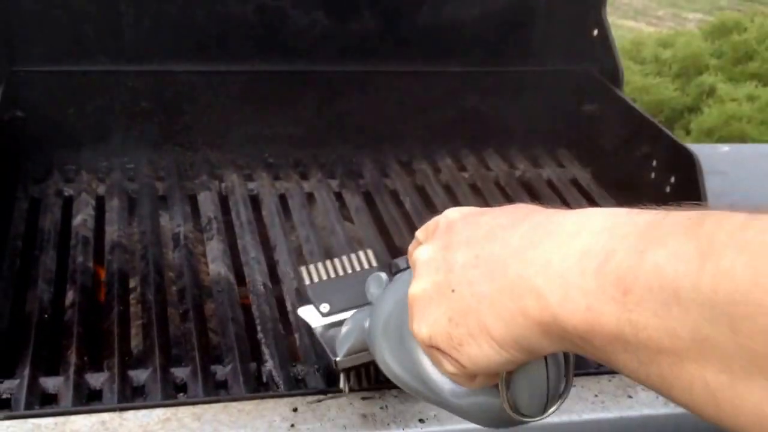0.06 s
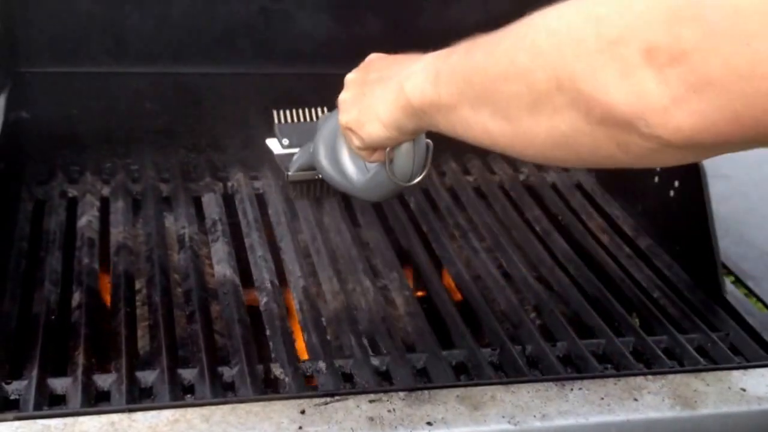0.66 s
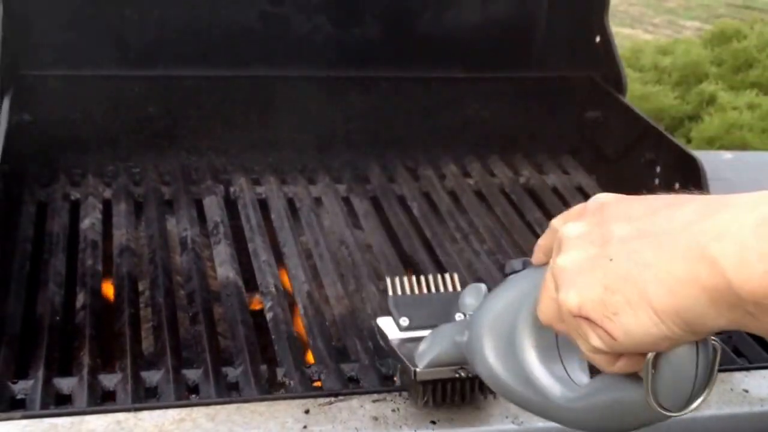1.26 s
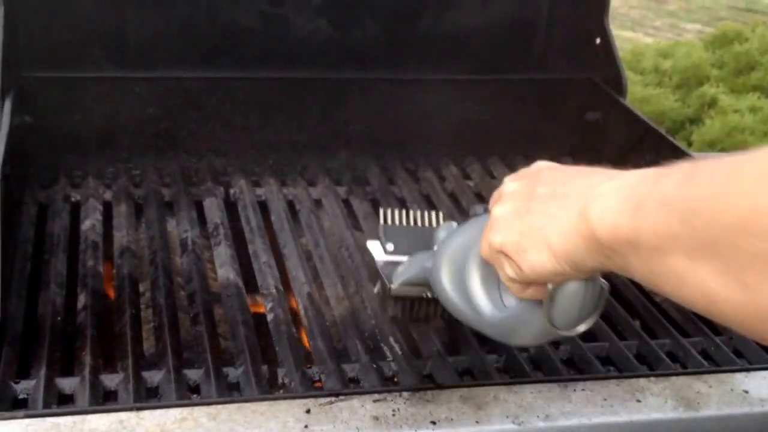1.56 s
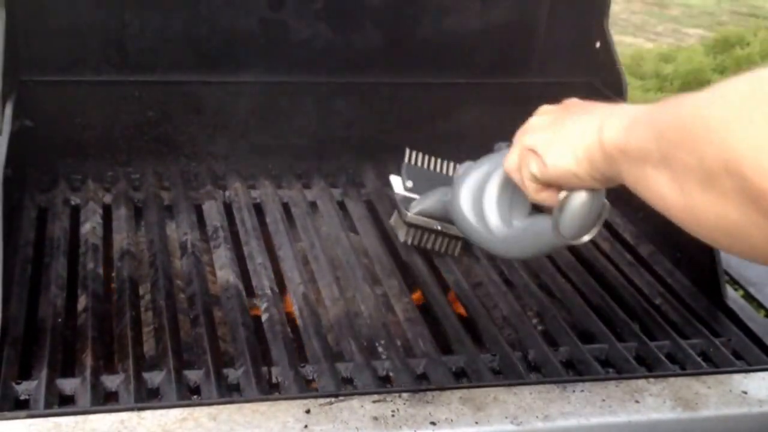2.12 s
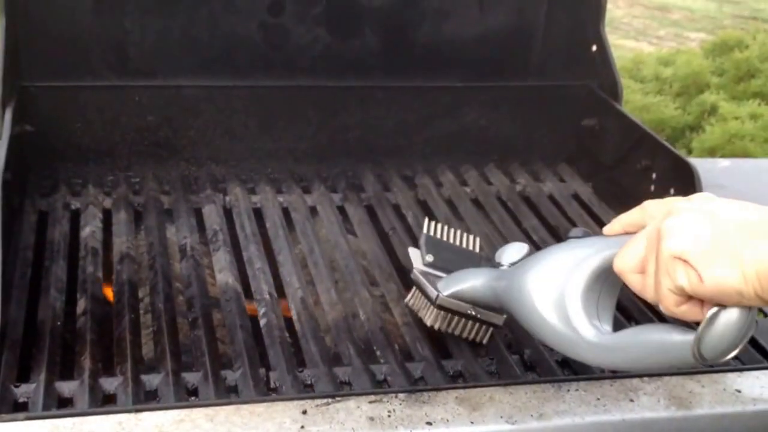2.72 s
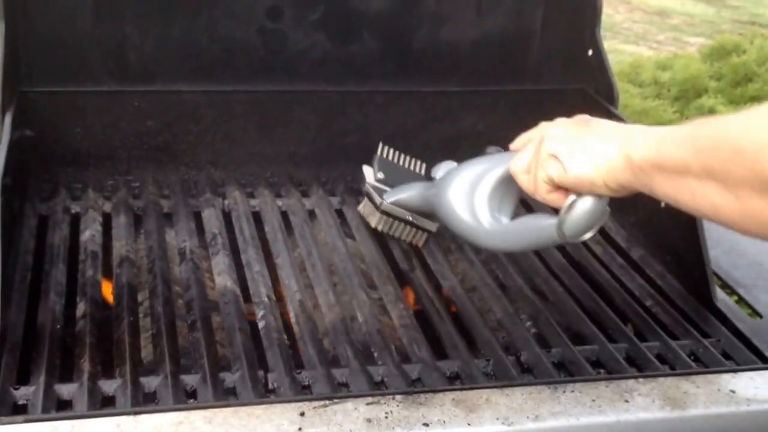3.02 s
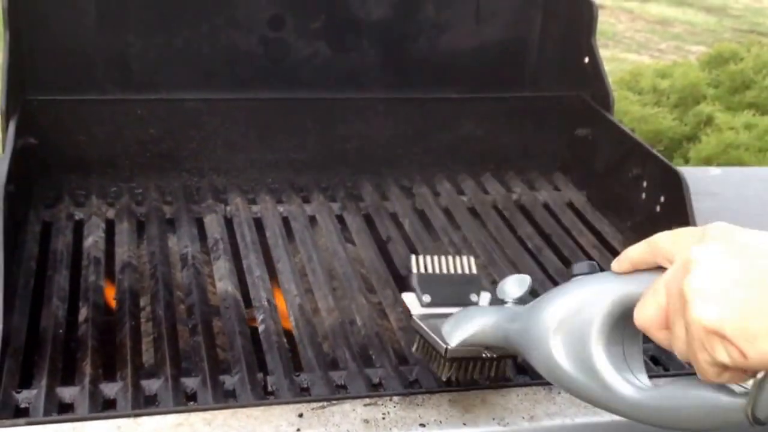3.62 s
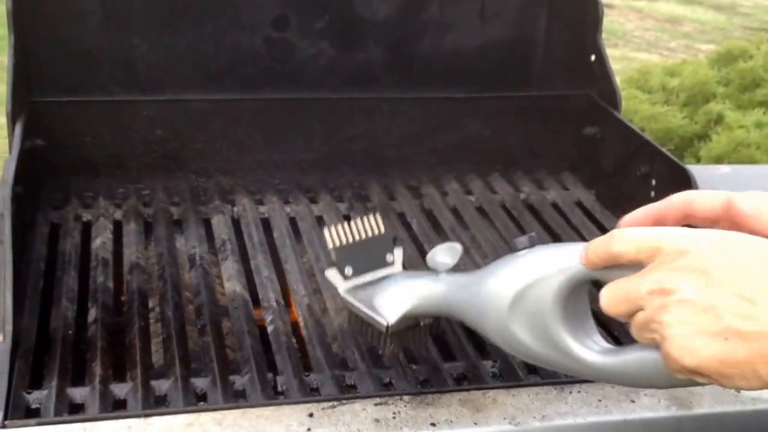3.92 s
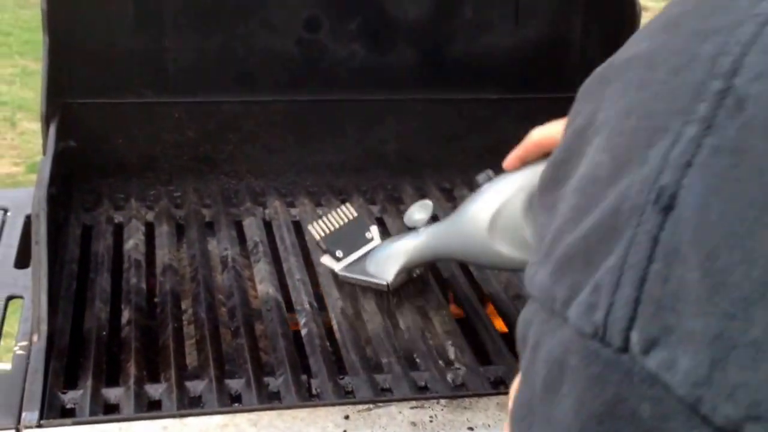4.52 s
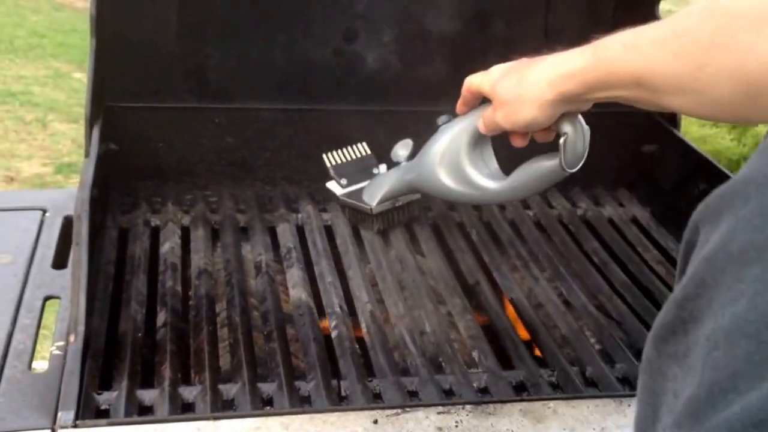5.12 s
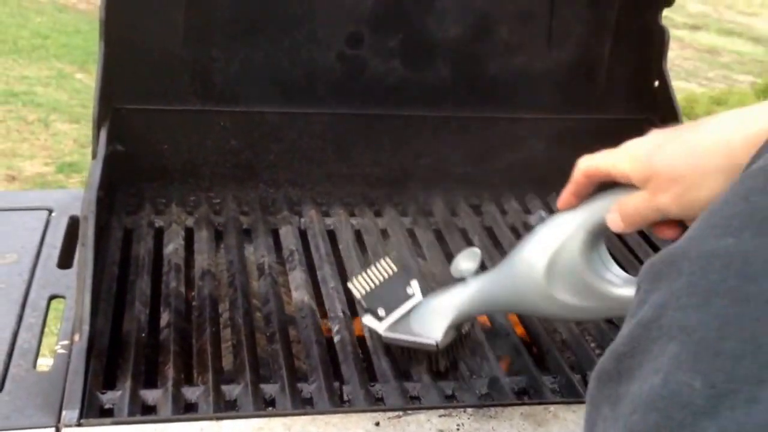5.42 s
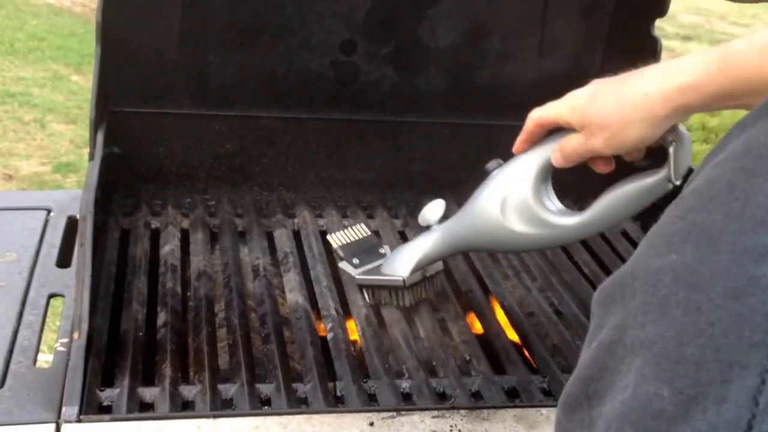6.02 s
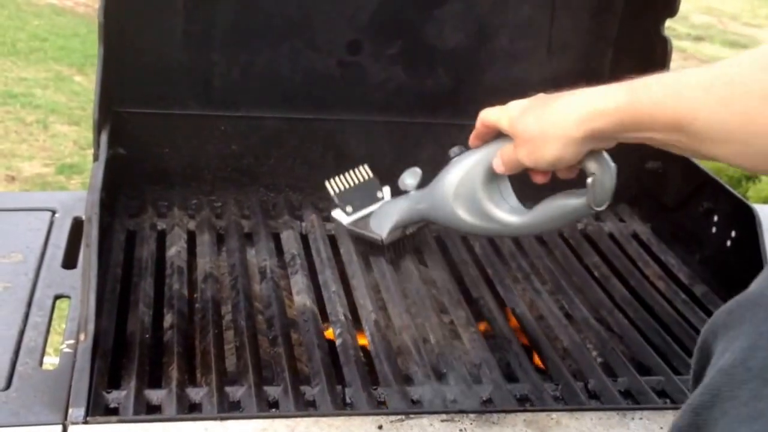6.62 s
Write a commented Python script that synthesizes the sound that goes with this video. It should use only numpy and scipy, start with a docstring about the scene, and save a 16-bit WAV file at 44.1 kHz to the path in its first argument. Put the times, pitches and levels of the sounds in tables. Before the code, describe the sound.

Wire bristles scrape along hot grill bars in repeated strokes while water hisses into steam, rising and falling with the brush. Four loud, ringing metal bangs, two early and two later, stand out from small knocks. Between the pairs come one dry tick of spitting grease and some thin wire squeaks. It is all heard close up, outdoors, over a low murmur of gas flames.

```python
"""A wire steam brush scrubs the hot grate of a gas grill, outdoors and close by. From the first stroke the
bristles scrape the bars with a high swish and water hisses into steam, all rising with the brush's speed.
At 0.6 and 1.7 s, among lighter knocks, its head bangs the far end of the grate and the steel firebox and
hood ring in their natural modes. At 2 s grease spits once; from then to 3.6 s single wires squeak by
stick-slip friction. Two more bangs come at 4.6 and 5.9 s. The burners murmur below throughout."""
import sys
import numpy as np
from scipy import signal
from scipy.fft import rfft, irfft, next_fast_len
from scipy.io import wavfile

SR = 44100
rng = np.random.default_rng(int(sys.argv[2]) if len(sys.argv) > 2 else 0)


def unload_audio(sound):
    """Save the sound as a 16-bit wav file, at the path given as the first command line argument."""
    columns = np.transpose(np.atleast_2d(sound))
    # keep every value between -1 and 1, then stretch to whole-number steps
    steps = np.round(np.clip(columns, -1, 1) * 32767)
    wavfile.write(sys.argv[1], SR, steps.astype(np.int16))


N = 298116
TIME = np.arange(N) / SR


# Blows of the brush head. Each row: start in seconds, relative level in dB, treble gain in dB,
# rise time in seconds, frequency the struck spot favours in Hz, its boost in dB.
BLOWS = [(.057, -28.5, 5.5, 0.0025, 263, 11), (.082, -37, -16, 0.007, 525, 27),
         (.240, -18.5, -3.5, 0.017, 432, 13), (.263, -22, -8, 0.0025, 1010, 3),
         (.617, -3, -2, 0.0032, 416, 3), (.654, -23, 5.5, 0.0022, 219, 10),
         (.944, -20.5, -1, 0.017, 950, -6), (1.176, -24, -3, 0.02, 1060, 10.5),
         (1.429, -34.5, 11.5, 0.012, 457, 6.5), (1.612, -30, -13, .003, 1100, -6),
         (1.707, -2, -3, 0.0011, 1000, 2), (2.144, -16, -5, 0.017, 234, 13),
         (2.741, -37, -12, 0.0041, 550, 13), (2.808, -26, -2.5, 0.0011, 1680, 5.5),
         (3.250, -23, -9, 0.0084, 437, 4), (3.988, -32.5, 14.5, 0.0033, 600, -12),
         (3.999, -18, -6, .0025, 510, 11.5), (4.595, -2.5, -.5, 0.0012, 1990, 4.5),
         (5.158, -24, 3.5, 0.003, 605, 9), (5.519, -29.5, 10.5, 0.012, 527, 14),
         (5.9, -2.5, 0.5, 0.0013, 1840, 4), (6.613, -26, -4, 0.0021, 550, 10.5)]
# Short, strong modes of grate and firebox. Each row: frequency in Hz, relative level in dB, T60 in seconds.
GRATE_RESONANCES = [(168, -24, .12), (190, -13, .13), (238, -18, .16), (320, -16, .17), (350, -15, .15),
                    (379, -13, .16), (408, -11, .17), (522, -21, .15), (551, -20, .17), (590, -23, .18),
                    (780, -24, .2), (830, -26, .2), (938, -20, .17), (965, -22, .17), (1003, -21, .18),
                    (1069, -25, .2), (1148, -26, .2), (1182, -29, .2), (1355, -29, .2), (1591, -25, .3),
                    (1759, -26, .22), (1820, -25, .2), (1858, -24, .2), (2010, -28, .2), (2055, -28, .2),
                    (2191, -31, .2), (2320, -32, .2), (2486, -31, .2), (2885, -33, .15), (2950, -33, .15)]
# Long, faint modes of the open hood. Each row: frequency in Hz, relative level in dB, T60 in seconds.
HOOD_RESONANCES = [(135, -41, 1.6), (195, -32, .9), (211, -31, .8), (250, -32, .5), (330, -35, .5),
                   (388, -31, 1.1), (434, -34, .7), (527, -35, 1.0), (640, -38, .6), (870, -39, .6),
                   (1010, -38, .6), (1620, -37, .5)]
# Fast decay of the sheet steel. Each row: frequency in Hz, T60 in seconds.
SHEET_DECAY = [(40, .15), (150, 0.33), (400, 0.17), (1000, 0.31), (2000, 0.17), (4000, 0.27), (15000, 0.19)]
# Lingering ring of the sheet steel. Each row: frequency in Hz, level in dB relative to the fast decay.
SHEET_TAIL = [(60, -36), (130, -51), (250, -9.5), (500, -9), (1000, -11.5), (2000, -11), (4000, -25),
              (15000, -17)]

def knocks(crack_hz=1500, crack_db=7, crack_t60=0.016, tail_t60=0.77, travel_s=0.00187,
           modes_db=2, sheet_db=-11, uneven_db=3.0):
    """Modal superposition: each impact excites damped modes, the strong ones as tones, the rest as noise."""
    out, t = np.zeros(N), TIME[:SR]
    centres, bands = sheet_bands()
    hz, mode_db, t60 = np.transpose(GRATE_RESONANCES + HOOD_RESONANCES)[:, :, None]
    crack = from_db(crack_db) * fade(t, crack_t60) * centres / (centres + crack_hz)
    tail = from_db(at_hz(SHEET_TAIL, centres)) * fade(t, tail_t60)
    sheet_envelope = crack + fade(t, at_hz(SHEET_DECAY, centres)) + tail
    # a blow reaches each part of the box a moment later
    since = np.maximum(t - travel_s * rng.random(hz.shape), 0)
    rings = np.sin(2 * np.pi * hz * since) * fade(since, t60)
    for start_s, level_db, treble_db, rise_s, favoured_hz, boost_db in BLOWS:
        start = int(start_s * SR)
        size = min(SR, N - start)
        mode_gains = from_db(modes_db + mode_db + uneven_db * rng.standard_normal(hz.shape))
        mode_gains *= contact(hz, treble_db, favoured_hz, boost_db)
        body = mode_gains[:, 0] @ rings[:, :size]
        band_gains = from_db(sheet_db) * contact(centres[:, 0], treble_db, favoured_hz, boost_db)
        clash = band_gains @ (sheet_envelope[:, :size] * bands[:, start:start + size])
        attack = 1 - np.exp(-t[:size] / rise_s)
        out[start:start + size] += from_db(level_db) * attack * (body + clash)
    return out


def contact(hz, treble_db, favoured_hz, boost_db, corner_hz=1400, spread_octaves=0.18):
    """Impact excitation: a harder contact adds treble, and each spot on the grate favours its own modes."""
    treble = hz ** 4 / (hz ** 4 + corner_hz ** 4)
    favoured = np.exp(-(np.log2(hz / favoured_hz) / spread_octaves) ** 2)
    return from_db(treble_db * treble + boost_db * favoured)


# The crowd of weak sheet-steel modes. Each row: frequency in Hz, relative spectral density in dB.
SHEET_SPECTRUM = [(40, -34), (90, -44), (150, -6), (250, 3.5), (420, 2.5), (680, -8.5), (950, -1.5),
                  (1300, -8), (1900, -8), (2600, -11), (3400, -16), (4800, -24.5), (6200, -14.5),
                  (9000, -30), (15000, -28)]

def sheet_bands():
    """Modal overlap: dense modes act as noise. Gives centres and third-octave bands that sum to rms 1."""
    edges = 30 * 2 ** (np.arange(28) / 3 + 1 / 10)
    centres = np.sqrt(edges[1:] * edges[:-1])
    white = rng.standard_normal((2, N))
    bands = []
    for k, hz in enumerate(centres):
        bandpass = signal.butter(2, edges[k:k + 2], "band", fs=SR, output="sos")
        bands.append(from_db(at_hz(SHEET_SPECTRUM, hz)) * signal.sosfilt(bandpass, white[k % 2]))
    return centres[:, None], np.array(bands) / np.std(np.sum(bands, axis=0))


# Sweeps of the brush along the bars. Each row: start, fastest moment and stop in seconds,
# then relative levels of scrape, swish and steam at full speed in dB.
SWEEPS = [(-.18, 0.107, 0.32, -46, -44.5, -44), (.15, 0.408, 0.79, -44.5, -38, -38),
          (0.638, 0.963, 1.54, -36.5, -41.5, -41.5), (1.304, 1.638, 1.97, -47, -43.5, -44.5),
          (1.992, 2.014, 2.46, -39, -45, -49.5), (2.24, 2.57, 2.87, -44, -51.5, -55),
          (2.702, 2.89, 3.195, -45.5, -44, -47.5), (3.144, 3.313, 3.58, -36.5, -38, -47),
          (3.45, 3.552, 3.67, -45.5, -66, -71), (3.776, 4.287, 4.32, -51.5, -48, -51),
          (4.215, 4.544, 4.62, -48.5, -41, -42), (4.586, 4.834, 5.146, -45, -45, -49.5),
          (5.078, 5.266, 5.69, -39.5, -42.5, -45), (5.64, 5.925, 6.1, -64, -45.5, -46),
          (5.936, 6.246, 6.6, -44, -45, -46), (6.473, 6.751, 7.2, -37.5, -40.5, -42)]

def brushing():
    """Common excitation: one motion, the speed of the brush, drives scrape, swish and steam together."""
    *_, scrape_db, swish_db, steam_db = np.transpose(SWEEPS)
    return (scrape(stroke_level(scrape_db, exponent=1.17, rest_db=-62.5))
            + swish(stroke_level(swish_db, exponent=1.07, rest_db=-55))
            + steam(stroke_level(steam_db, exponent=0.94, rest_db=-54)))


def stroke_level(peaks_db, exponent, rest_db):
    """Power law: amplitude grows as a power of speed, a sine arch in each stroke. Gives dB over time."""
    power = from_db(rest_db) ** 2
    for (start_s, fastest_s, stop_s, *_), peak_db in zip(SWEEPS, peaks_db):
        speed = np.sin(np.pi / 2 * np.interp(TIME, [start_s, fastest_s, stop_s], [0, 1, 0]))
        power = power + (from_db(peak_db) * speed ** exponent) ** 2
    return 10 * np.log10(power)


# The scrape as the grate radiates it. Each row: frequency in Hz, relative spectral density in dB.
SCRAPE_SPECTRUM = [(80, 16.5), (150, -9), (220, 10.5), (310, -4), (500, 8.5), (690, -0.5), (780, 1),
                   (1400, -7), (1700, -6), (2700, -3.5), (3300, -16), (4400, -21), (6000, -37),
                   (15000, -41)]

def scrape(level_db, gain_db=1.5, slips_per_s=3000, ring_db=6, ring_width_hz=16):
    """Friction noise: wire tips catch and slip on crusted bars, driving grate modes of varying strength."""
    clicks = grains(slips_per_s, spread_db=2.5)
    judder = from_db(0.8 * drift(45))
    slips = colour(clicks * judder, SCRAPE_SPECTRUM)
    ringing = sum(resonate(slips, hz, ring_width_hz) * (-1) ** k * from_db(2.2 * drift(9))
                  for k, (hz, _, _) in enumerate(GRATE_RESONANCES))
    return (from_db(gain_db + level_db) + crush()) * rms_one(slips + from_db(ring_db) * ringing)


def crush(lead_db=-27, build_s=0.018):
    """Friction grows with load: bristles crushed on the rail swell the scrape just before each knock."""
    hits = np.zeros(N)
    for start_s, level_db, *_ in BLOWS:
        hits[int(start_s * SR)] = from_db(level_db + lead_db)
    # a decay run backwards in time builds up to each hit
    return signal.lfilter([1], [1, -np.exp(-1 / (build_s * SR))], hits[::-1] + 1e-18)[::-1]


# Spectral peaks of the swish. Each row: frequency in Hz, bandwidth in Hz, relative level in dB.
SWISH_RESONANCES = [(3970, 420, -5), (4420, 99, -6), (5340, 200, 2), (5850, 184, 4.5), (6290, 110, 3),
                    (6100, 3700, -3), (6440, 92, -22.5), (6830, 170, 0.5), (7370, 100, -2),
                    (8150, 350, -19)]

def swish(level_db, gain_db=-0.5, clicks_per_s=4000, spread_db=3.0, flutter_db=2.0):
    """Resonant filtering: a high, hissing swish with fixed narrow peaks, rising with each brush stroke."""
    hiss = sum(from_db(db + flutter_db * drift(30)) * resonate(grains(clicks_per_s, spread_db), hz, width)
               for hz, width, db in SWISH_RESONANCES)
    return from_db(gain_db + level_db) * rms_one(hiss)


# Water flashing to steam. Each row: frequency in Hz, relative spectral density in dB.
STEAM_SPECTRUM = [(500, -2), (2000, 2.5), (3300, -6), (4700, -16), (6500, 4), (9000, -3), (11000, -1.5),
                  (13500, 1.5), (15500, 0.5)]

def steam(level_db, gain_db=4, bursts_per_s=20000, spread_db=1.5, sputter_db=1.36):
    """Flash boiling: countless droplets burst on the hot bars and merge into a bright hiss."""
    envelope = from_db(gain_db + level_db + sputter_db * drift(40))
    return envelope * colour(grains(bursts_per_s, spread_db), STEAM_SPECTRUM)


# Single wires squeaking on a bar. Each row: start and length in seconds, first and last pitch in Hz,
# nominal level in dB.
WIRE_SQUEAKS = [(2.008, .03, 6850, 6550, -42), (2.078, .045, 6450, 6400, -44),
                (2.402, .025, 3600, 4000, -52), (2.78, .07, 7000, 6600, -44), (3.145, .05, 3500, 3800, -53),
                (3.19, .05, 3200, 2550, -50), (3.52, .06, 2500, 2900, -56)]

def squeaks():
    """Stick-slip oscillation: a wire grips and slides unevenly at its own pitch, gliding as it bends."""
    out = np.zeros(N)
    pitch_jitter = 1 + 0.03 * drift(900)
    grip = from_db(3 * drift(300))
    for start_s, length_s, from_hz, to_hz, db in WIRE_SQUEAKS:
        start, size = int(start_s * SR), int(length_s * SR)
        span = slice(start, start + size)
        phase = 2 * np.pi * np.cumsum(np.linspace(from_hz, to_hz, size) * pitch_jitter[span]) / SR
        arch = np.sin(np.linspace(0, np.pi, size))
        out[span] += from_db(db) * grip[span] * arch * np.sin(phase)
    return out


# Spitting grease. Each row: start in seconds, peak level in dB.
GREASE_POPS = [(2.043, -21.5)]

def grease_pop(hz=3200, width_hz=2000):
    """Impulse response: a drop of grease spits with one dry, heavily damped tick."""
    clicks = np.zeros(N)
    for start_s, db in GREASE_POPS:
        clicks[int(start_s * SR)] = from_db(db)
    tick = resonate(resonate(clicks, hz, width_hz), hz, width_hz)
    return tick * clicks.max() / np.abs(tick).max()


# Gas flames. Each row: frequency in Hz, relative spectral density in dB.
FLAME_SPECTRUM = [(30, -36), (80, 23), (130, -1), (200, 9.5), (310, -2.5), (430, 2), (560, -4), (720, -39),
                  (1500, -18), (4000, -14), (12000, -59)]

def burner(level_db=-44, flicker_db=1.2):
    """Combustion noise: flickering gas flames murmur in the firebox."""
    return from_db(level_db + flicker_db * drift(12)) * colour(rng.standard_normal(N), FLAME_SPECTRUM)


def from_db(db):
    """Decibels to amplitude gain."""
    return 10 ** (np.asarray(db) / 20)


def rms_one(x):
    """Normalisation to rms 1."""
    return x / np.sqrt(np.mean(x ** 2) + 1e-20)


def at_hz(points, hz):
    """Interpolation of a (Hz, value) table on a log-frequency axis."""
    freqs, values = np.transpose(points)
    return np.interp(np.log(hz), np.log(freqs), values)


def drift(knots_per_s):
    """Random modulation: a wander of rms 1 through random knots."""
    knots = rng.standard_normal(4096)
    return rms_one(np.interp(TIME * knots_per_s, np.arange(len(knots)), knots))


def fade(t, t60):
    """Exponential decay, 60 dB down after t60."""
    return np.exp(-np.log(1000) * t / t60)


def colour(x, spectrum):
    """Spectral shaping of a steady sound, scaled to rms 1."""
    size = next_fast_len(N)
    hz = np.maximum(np.fft.rfftfreq(size, 1 / SR), 1)
    return rms_one(irfft(rfft(x, size) * from_db(at_hz(spectrum, hz)), size)[:N])


def resonate(x, hz, width_hz):
    """Two-pole resonance with gain 1 at its peak."""
    r = np.exp(-np.pi * width_hz / SR)
    feedback = [1, -2 * r * np.cos(2 * np.pi * hz / SR), r * r]
    return signal.lfilter(np.array([1, 0, -1]) * (1 - r * r) / 2, feedback, x + 1e-18)


def grains(per_s, spread_db):
    """Shot noise: random clicks of uneven size and sign."""
    clicks = (rng.random(N) < per_s / SR) * rng.choice([-1, 1], N)
    return clicks * from_db(spread_db * np.minimum(rng.exponential(1, N), 4))


def scene():
    """Superposition: all sources add at one microphone, the same in both channels."""
    mix = brushing() + knocks() + squeaks() + burner() + grease_pop()
    return np.array([mix, mix])


def record(dry, low_cut_hz=141, high_cut_hz=15350):
    """Band limiting and saturation: the microphone sheds bass, rounds the loudest bangs, cuts the top."""
    thin = signal.sosfilt(signal.butter(8, low_cut_hz, "high", fs=SR, output="sos"), dry)
    rounded = thin / (1 + thin ** 4) ** (1 / 4)
    return signal.sosfilt(signal.ellip(12, .1, 80, high_cut_hz, fs=SR, output="sos"), rounded)


dry = scene()
out = record(dry)
unload_audio(out)
```